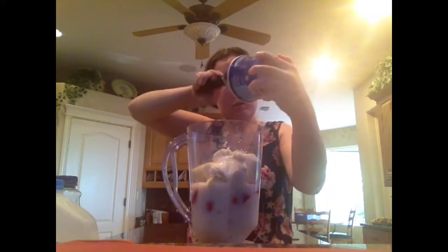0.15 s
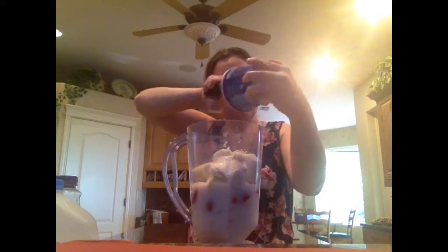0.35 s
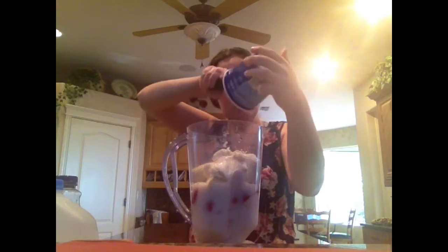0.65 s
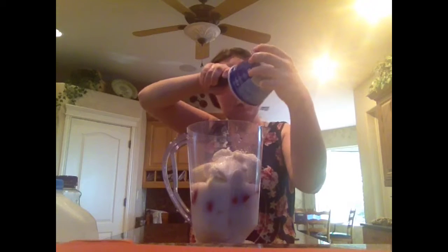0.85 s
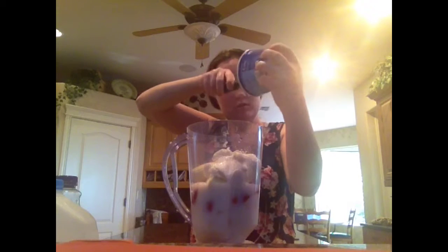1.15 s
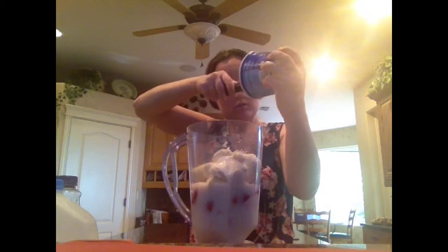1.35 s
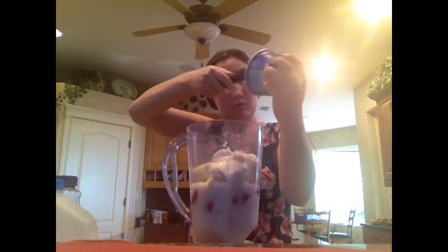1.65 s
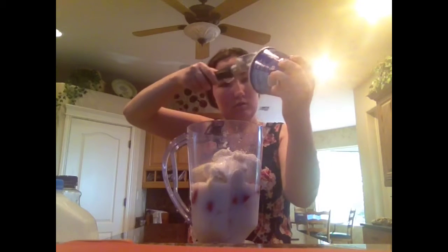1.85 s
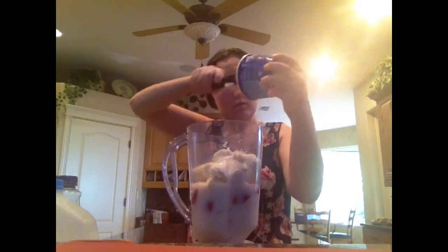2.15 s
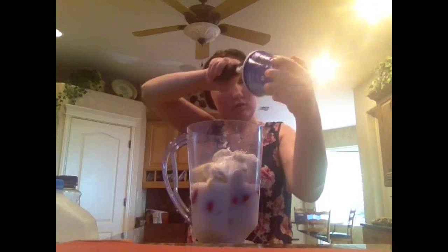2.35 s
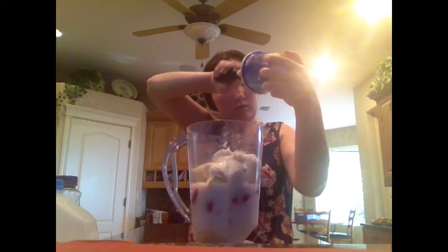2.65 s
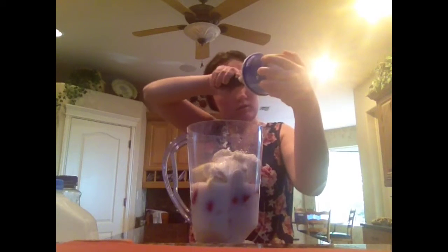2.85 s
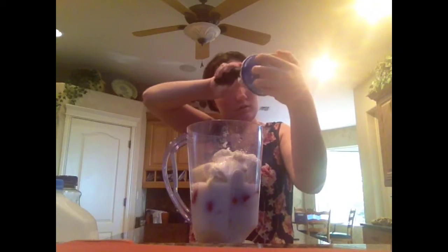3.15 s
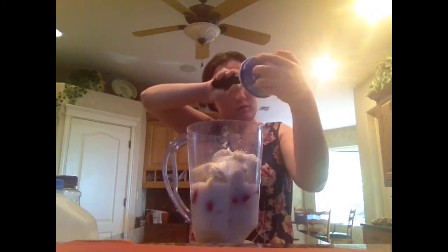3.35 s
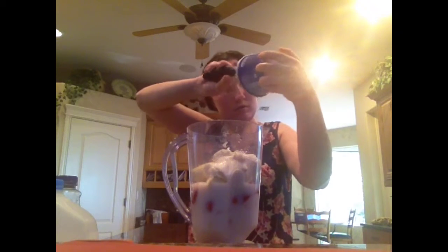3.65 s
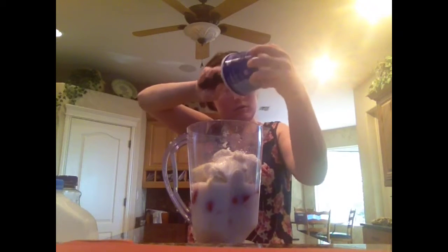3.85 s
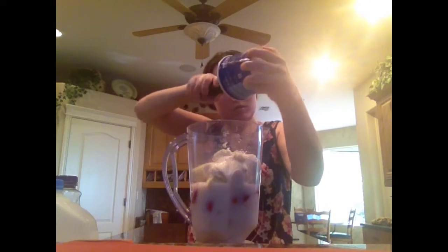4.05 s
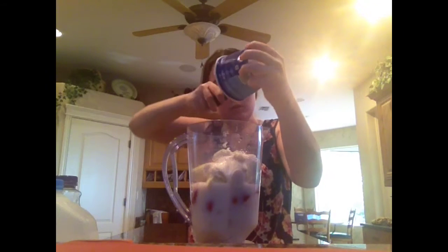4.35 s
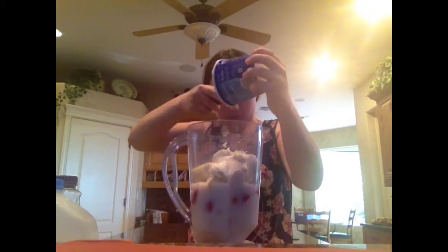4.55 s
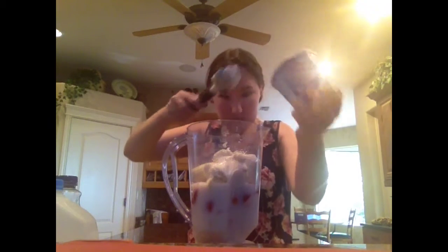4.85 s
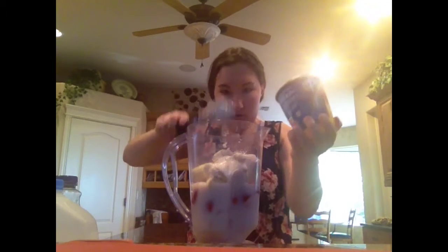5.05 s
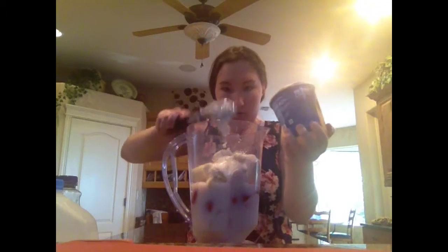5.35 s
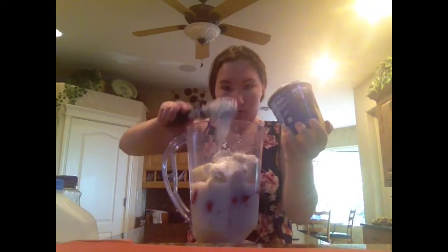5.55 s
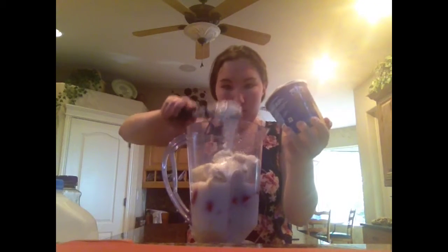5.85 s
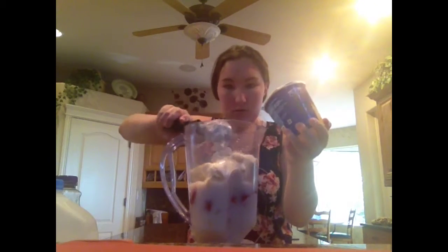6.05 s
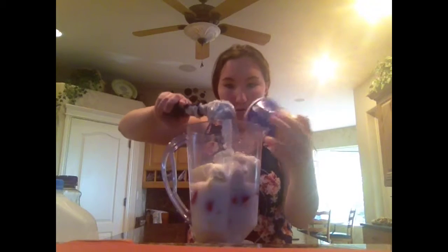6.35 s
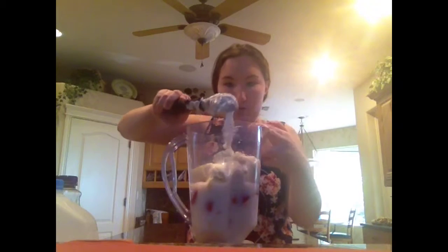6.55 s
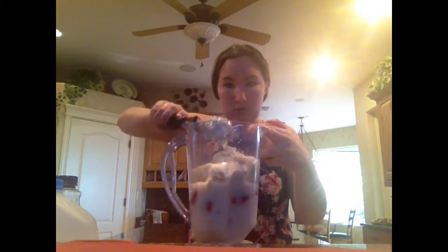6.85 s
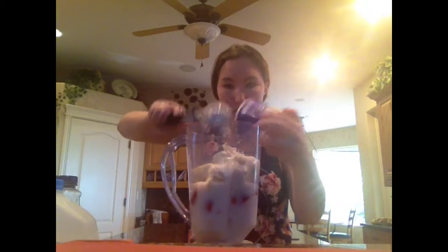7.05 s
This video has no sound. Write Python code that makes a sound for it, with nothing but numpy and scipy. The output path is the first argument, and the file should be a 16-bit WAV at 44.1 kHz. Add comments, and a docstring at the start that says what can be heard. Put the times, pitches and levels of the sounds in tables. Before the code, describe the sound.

A faint, low rush of air fills a live kitchen throughout. At 0.1 s a thin plastic tub wall buckles with a loud dull pop. From 0.25 to 1.7 s a metal spoon scrapes frozen yogurt in swelling strokes, icy hiss over a hollow, squeaky plastic note, with a short gap around 0.7 s and sharp slips near 1.65 s. After a lull, another pop and brief icy crunch come at 2.15 s; softer strokes run from 2.55 to 3.55 s. From 3.7 to 4.7 s the scraping is strongest and fastest, with hard snapping catches and small pops. After a short pause, the loaded spoon knocks a half-full plastic pitcher's rim at 5.1, 5.4, 5.65, 6.0, 6.7 and 7.1 s: damped low thuds with a broad clack and diffuse room tail, light ticks in between. A small microphone leaves little deep bass.

```python
"""Throughout, shaped broadband noise gives the low rush of moving air in a live kitchen.
From the start a metal spoon scrapes frozen yogurt out of a thin plastic tub: breaking ice crystals hiss and
excite the wall's resonances, the wall squeaks as the spoon slips, and decaying modes pop as it buckles.
The loaded spoon then knocks six times on the rim of a half-full plastic pitcher: low modes thud, a noise
burst clacks, and diffuse reflections ring after each knock; lighter touches tick in between."""
import sys
import numpy as np
from scipy import signal
from scipy.fft import rfft, irfft
from scipy.io import wavfile

SR = 44100
rng = np.random.default_rng(int(sys.argv[2]) if len(sys.argv) > 2 else 0)


def store_pcm(level_fs):
    """Save levels as 16-bit WAV."""
    pcm = np.round(np.clip(level_fs, -1, 1) * 32767).astype(np.int16)
    wavfile.write(sys.argv[1], SR, np.atleast_2d(pcm).T)


N = 317079
SHORT = np.arange(SR // 4) / SR   # time axis of one short sound, s


def from_db(db):
    """Logarithmic level: 20 dB is a factor of ten in amplitude."""
    return 10 ** (np.asarray(db) / 20)


def rms_one(x):
    """Normalization: scale to unit rms."""
    return x / np.sqrt(np.mean(x ** 2) + 1e-20)


def at_hz(points, hz):
    """Interpolation on a logarithmic frequency axis."""
    f, value = np.transpose(points)
    return np.interp(np.log(np.maximum(hz, 1)), np.log(f), value)


def add(track, s, sound):
    """Superposition: add a sound to the track at time s."""
    at = round(s * SR)
    track[at:at + len(sound)] += sound[:N - at]


def colour(x, spectrum, tilt=0):
    """Spectral shaping: filter to a spectrum tilted in dB per octave about 2 kHz; rms 1."""
    hz = np.maximum(np.fft.rfftfreq(len(x), 1 / SR), 1)
    gain = from_db(at_hz(spectrum, hz) + tilt * np.log2(hz / 2000))
    return rms_one(irfft(rfft(x) * gain, len(x)))


def drift(per_s):
    """Random modulation: chance values, per_s a second, joined by straight lines; rms 1."""
    place = np.arange(N) / SR * per_s
    return rms_one(np.interp(place, np.arange(N), rng.standard_normal(N)))


def resonance(x, hz, width_hz):
    """Two-pole resonance: bandwidth sets the pole radius; the centre may move in short blocks."""
    radius = np.exp(-np.pi * width_hz / SR)
    angle = 2 * np.pi * np.broadcast_to(hz, x.shape) / SR
    out, state, size = np.zeros(len(x)), np.zeros(2), 512
    for i in range(0, len(x), size):
        poles = [1, -2 * radius * np.cos(angle[i]), radius * radius]
        out[i:i + size], state = signal.lfilter([1, 0, -1], poles, x[i:i + size], zi=state)
    return out


def struck(modes, pitch, spread_db):
    """Modal superposition: exponentially decaying sines, alternate in sign, with random level spread."""
    hz, db, t60 = np.transpose(modes)[:, :, None]
    gain = from_db(db + spread_db * rng.standard_normal(db.shape) - 60 * SHORT / t60)
    signs = (-1) ** np.arange(len(modes))
    return signs @ (gain * np.sin(2 * np.pi * hz * pitch * SHORT))


def burst(spectrum, tilt, rise_s, t60):
    """Modal overlap: noise stands for many crowded modes that swell and die together."""
    swell = 1 - np.exp(-(SHORT / rise_s) ** 2)
    noise = colour(rng.standard_normal(len(SHORT)), spectrum, tilt)
    return noise * swell * from_db(-60 * SHORT / t60)


def spurt(sound, db, length):
    """Energy scaling: a short sound gets the energy of level db held for length seconds."""
    return from_db(db) * sound * np.sqrt(length * SR / np.sum(sound ** 2))


# spectrum of the moving air: (f/Hz, relative level per Hz/dB)
AIR_SPECTRUM = [(30, -2), (75, -27), (120, -10.5), (190, 0.5), (280, -9), (480, -4.5), (750, -16.5),
                (1100, -19.5), (2000, -22), (4000, -29.5), (7500, -35), (10500, -43.5), (14000, -38.5),
                (15500, -39)]


def air(level_db=-56.5, waver_db=0.96):
    """Broadband noise: the low rush is shaped noise whose level wavers slightly."""
    level = from_db(level_db + waver_db * drift(8))
    return level * colour(rng.standard_normal(N), AIR_SPECTRUM)


# decay of the kitchen's reverberation: (f/Hz, t60/s)
ROOM_DECAY = [(120, .5), (400, 0.6157), (2000, 0.7261), (5000, 0.63), (9000, 0.44), (15000, 0.15)]


def reverberation(spectrum, tilt=0, build_s=0.0073):
    """Diffuse field: one second of dense reflections, builds quickly, decays by band; energy 1."""
    t, hz = np.arange(SR) / SR, np.fft.rfftfreq(SR, 1 / SR)
    noise = rfft(colour(rng.standard_normal(SR), spectrum, tilt))
    centres, tail = [f for f, t60 in ROOM_DECAY], 0
    # overlapping bands, each with its own decay
    for share, (f, t60) in zip(np.eye(len(centres)), ROOM_DECAY):
        band = irfft(noise * at_hz(list(zip(centres, share)), hz), SR)
        tail = tail + band * from_db(-60 * t / t60)
    tail = tail * (1 - np.exp(-(t / build_s) ** 2))
    return tail / np.sqrt(np.sum(tail ** 2))


# spectrum of the kitchen's reflections: (f/Hz, relative level per Hz/dB)
ROOM_SPECTRUM = [(100, 1.5), (250, 0.5), (500, -2.5), (1000, 2.5), (2200, -1), (6000, 0), (14000, 3)]


def kitchen(x, wet_db):
    """Convolution: the direct sound plus its diffuse reflections."""
    return x + from_db(wet_db) * signal.fftconvolve(x, reverberation(ROOM_SPECTRUM))[:N]


# buckling of the tub wall: (t/s, level/dB)
WALL_POPS = [(0.1041, -24), (2.1747, -29), (3.711, -42.5), (4.3372, -40.5)]
# modes of the buckling wall: (f/Hz, relative level/dB, t60/s)
WALL_MODES = [(242, 2, 0.036), (335, 0.5, 0.026), (464, -9.5, 0.03), (774, 0.5, 0.031),
              (2230, -13.5, 0.012), (3380, -42, 0.0014)]
# click of the wall, also the tick of a light touch on the rim: (f/Hz, relative level per Hz/dB)
TICK_SPECTRUM = [(100, -42), (1000, 0.5), (2000, 10), (3200, 6), (5000, 0.5), (9000, -21), (15000, -34)]


def pops(snap_db=-18):
    """Snap-through buckling: the thin wall clicks and its modes give a dull, quickly damped note."""
    out = np.zeros(N)
    for s, db in WALL_POPS:
        snap = from_db(snap_db) * burst(TICK_SPECTRUM, 0, rise_s=0.000037, t60=0.038)
        add(out, s, from_db(db) * (struck(WALL_MODES, 1, spread_db=0.0) + snap))
    return out


def crystals(per_s, spread_db):
    """Random impulse process: ice crystals break under the edge, most small, a few large."""
    sizes = from_db(spread_db * np.minimum(rng.exponential(1, N), 5)) * rng.choice([-1, 1], N)
    return rms_one(sizes * (rng.random(N) < per_s / SR))


def tub_wall(x, hz=745, width_hz=250, wander=0.034):
    """Cascaded resonance: the tub's hollow note, steep on both sides, shifts as the spoon presses elsewhere."""
    centre = hz * (1 + wander * drift(13)[:len(x)])
    return rms_one(resonance(resonance(x, centre, width_hz), centre, width_hz))


# spectrum of the scraping hiss: (f/Hz, relative level per Hz/dB)
HISS_SPECTRUM = [(400, -27), (1100, -6), (1600, -22), (2600, 2), (3500, 2), (4900, -1.5), (6000, -3),
                 (7000, -3.5), (8500, -8.5), (10500, -19.5), (15000, -35)]


def crunch(grains, patchy_db=1.9, patches_per_s=80, count=12):
    """Independent band modulation: as the contact shifts, each treble band flares and fades by itself."""
    edges, out = np.geomspace(1400, 15000, count + 1), 0
    for low, high in zip(edges, edges[1:]):
        band_pass = signal.butter(2, [low, high], "band", fs=SR, output="sos")
        band = signal.sosfilt(band_pass, grains)
        out = out + band * from_db(patchy_db * drift(patches_per_s))
    return colour(out, HISS_SPECTRUM)


# spoon strokes: (start t/s, end t/s, force level/dB, ring at mid-stroke f/Hz, hiss peak f/Hz);
# both frequencies are those before the wall flexes
SPOON_STROKES = [(0.25, 0.381, -5.5, 1860, 5000), (0.384, 0.521, 0, 1870, 6940),
                 (0.5, 0.675, -14.5, 2040, 4640), (0.84, 1.19, -2, 2000, 6630),
                 (1.183, 1.435, 0, 2120, 4560), (1.405, 1.727, -9, 2080, 3300),
                 (2.558, 2.672, -15, 1950, 5500), (2.635, 2.792, 0, 1980, 2870),
                 (2.796, 2.912, -8.5, 1970, 3340), (2.949, 3.13, -13, 2070, 4470),
                 (3.073, 3.312, -3.5, 2000, 4450), (3.298, 3.54, -3, 1900, 3720),
                 (3.797, 3.881, 7.5, 1880, 8100), (3.88, 4.012, 2, 1910, 4870),
                 (4.005, 4.112, 8, 1950, 4900), (4.113, 4.296, 3, 2040, 6630),
                 (4.346, 4.514, 4, 1980, 6800), (4.5, 4.719, -5, 1950, 6800)]
# force drives all three voices: level at 0 dB of force, and dB gained per dB of force
RING_DB = -53   # gains 1 dB per dB
WALL_DB, WALL_FOLLOWS = -56, 0.68
HISS_DB, HISS_FOLLOWS = -54, 0.76
RING_RISE_HZ_PER_S = 320   # the note climbs as the spoon travels along the wall


def scraping(judder_db=0.4, judder_per_s=130, wander=0.024, squeak_db=-7.5, roundness=0.94):
    """Excitation and resonance: in each swelling stroke, crushed crystals hiss and drive the tub."""
    out = np.zeros(N)
    grains = crystals(per_s=6000, spread_db=1.5) * from_db(judder_db * drift(judder_per_s))
    rasp, wall = crunch(grains), tub_wall(grains)
    flex = 1 + wander * drift(25)   # the notes shift as the wall bends
    for start, end, force_db, ring_hz, hiss_hz in SPOON_STROKES:
        on = slice(round(start * SR), round(end * SR))
        from_middle_s = np.arange(on.start, on.stop) / SR - (start + end) / 2
        hz = (ring_hz + RING_RISE_HZ_PER_S * from_middle_s) * flex[on]
        ring = rms_one(resonance(resonance(grains[on], hz, width_hz=170), hz, width_hz=2000))
        squeak = rms_one(resonance(grains[on], hiss_hz * flex[on], width_hz=280))
        hiss = rms_one(rasp[on] + from_db(squeak_db) * squeak)
        voices = (from_db(RING_DB + force_db) * ring
                  + from_db(WALL_DB + WALL_FOLLOWS * force_db) * wall[on]
                  + from_db(HISS_DB + HISS_FOLLOWS * force_db) * hiss)
        pressure = np.sin(np.pi * (np.arange(len(ring)) + .5) / len(ring)) ** roundness
        add(out, start, pressure * voices)
    return out


# spectrum of crushed ice: (f/Hz, relative level per Hz/dB)
GRIT_SPECTRUM = [(100, -24), (1200, -5.5), (2000, 5.5), (2800, -1.5), (5000, -4), (7200, -3.5),
                 (10000, -14.5), (15000, -33)]


def grit(db, length, envelope):
    """Enveloped noise: a short spurt of crushed ice."""
    return spurt(colour(rng.standard_normal(len(SHORT)), GRIT_SPECTRUM) * envelope, db, length)


def faint_slips(per_s=7.6, top_db=-55.5, range_db=2, length_s=.0015):
    """Random renewal process: tiny catches from first stroke to last; rows (t/s, level/dB, decay/s)."""
    first, last = SPOON_STROKES[0][0], SPOON_STROKES[-1][1]
    gaps, weakness = rng.random((80, 2)).T
    times = first + np.cumsum(.5 + gaps) / per_s
    levels = top_db - range_db * weakness
    return [(s, db, length_s) for s, db in zip(times, levels) if s < last]


# the spoon catches hard and slips: (t/s, wall level/dB, decay time constant/s)
HARD_SLIPS = [(1.641, -43, 0.019), (1.678, -37.5, 0.0065), (1.701, -41, 0.0041), (2.319, -50, .002),
              (2.491, -50, 0.0044), (2.637, -45, .0038), (2.666, -41, 0.0022), (2.766, -44, 0.0049),
              (3.008, -52.5, 0.0021), (3.09, -47.5, 0.0018), (3.708, -38, 0.0032), (3.737, -44, 0.0042),
              (3.822, -32.5, 0.0031), (3.853, -43.5, 0.0057), (4.066, -37, 0.0074), (4.337, -36, 0.0028),
              (4.474, -43.5, 0.0039)]
ORDINARY_SLIP_S = 0.0047
SLIP_GRIT_DB = -10   # grit against the wall, for an ordinary slip
SLOW_SLIP_DULLS_DB = 5   # grit lost per doubling of the length


def slips(wall_ring_s=0.00061):
    """Stick-slip: each release spurts grit, more of it when quick, and the wall answers."""
    out = np.zeros(N)
    for s, db, length in HARD_SLIPS + faint_slips():
        dying = np.exp(-SHORT / length)
        wall = tub_wall(rng.standard_normal(len(SHORT)) * dying)
        add(out, s, spurt(wall, db, length + wall_ring_s))   # the wall rings a little longer
        grit_db = db + SLIP_GRIT_DB - SLOW_SLIP_DULLS_DB * np.log2(length / ORDINARY_SLIP_S)
        add(out, s, grit(grit_db, length, dying))
    return out


# the edge digs into fresh ice: (t/s, level/dB)
ICE_DIGS = [(2.149, -52), (3.8, -47)]


def digs(length_s=.027):
    """Steady fracture: cutting into ice makes an even run of grit that stops when the edge is through."""
    out = np.zeros(N)
    for s, db in ICE_DIGS:
        add(out, s, grit(db, length_s, envelope=SHORT < length_s))
    return out


# modes of pitcher and counter, before each knock's pitch ratio: (f/Hz, relative level/dB, t60/s)
PITCHER_MODES = [(118.5, -11, 0.11), (140, -11.5, 0.092), (255, -7.5, 0.092), (319, -3.5, 0.085),
                 (425.7, 3, 0.07), (545.6, -4, 0.066), (701, -4, 0.053), (863, -12, 0.027),
                 (1283, -23.5, 0.049), (1506, -18, 0.13), (1790, -29, 0.1), (2159, -12.5, 0.051)]


def rim_modes(main_db):
    """Modal participation: where the spoon lands raises or lowers the strongest mode."""
    main = max(PITCHER_MODES, key=lambda mode: mode[1])
    return [(hz, db + main_db * (hz == main[0]), t60) for hz, db, t60 in PITCHER_MODES]


# knocks on the rim: (t/s, relative clack level/dB, relative thud level/dB, pitch ratio,
# brightness/dB per octave, main note's relative level/dB, set by the spot struck)
RIM_KNOCKS = [(5.0737, -21.5, -16.5, 0.99, 0, -0.5), (5.3852, -21, -16, 1.02, 0.3, -3),
              (5.6543, -18, -13.5, 0.96, -0.5, -1), (5.9750, -18, -14.5, 1.023, -2, 0),
              (6.6734, -17.5, -15, 1.04, -2.5, -7), (7.0797, -20.5, -17.5, 0.93, -0.56, -11)]
# light touches on the rim: (t/s, relative level/dB, brightness/dB per octave)
RIM_TOUCHES = [(5.461, -34, -9), (5.7507, -33.5, -3.5), (6.098, -29.5, -4.5), (6.502, -46, -7.5),
               (7.013, -41, 7), (7.024, -49, 5), (7.177, -40, -4)]
# crowded upper modes of the pitcher wall: (f/Hz, relative level per Hz/dB)
CLACK_SPECTRUM = [(80, -16), (400, 4.5), (1050, -5.5), (1600, -0.5), (2300, -1.5), (2800, -6), (4500, -8),
                  (6200, -12), (8300, -16), (10500, -25), (15000, -31)]
# a knock as the room returns it: (f/Hz, relative level per Hz/dB)
WASH_SPECTRUM = [(90, -20), (200, -3.5), (430, 7.5), (700, 1), (1000, -0.5), (1500, 1), (2200, -1.5),
                 (3000, -6), (6000, -12.5), (8500, -14), (11000, -20.5), (15000, -14)]


def pitcher(clack_db=3.5, wash_db=-4.5, bend_s=0.0012):
    """Impact excitation: the spoon bends the rim, low modes thud and the wall clacks; light touches tick."""
    body, wall = np.zeros(N), np.zeros(N)
    for s, wall_db, thud_db, pitch, tilt, main_db in RIM_KNOCKS:
        bending = 1 - np.exp(-SHORT / bend_s)
        thud = struck(rim_modes(main_db), pitch, spread_db=0.5) * bending
        add(body, s, from_db(thud_db) * thud)
        clack = from_db(wall_db + clack_db) * burst(CLACK_SPECTRUM, tilt, rise_s=0.0026, t60=0.058)
        add(wall, s, clack)
        # the wall radiates differently in every direction, so the room returns an even wash
        clack_size = np.sqrt(np.sum(clack ** 2))
        add(wall, s, from_db(wash_db) * clack_size * reverberation(WASH_SPECTRUM, tilt))
    for s, db, tilt in RIM_TOUCHES:
        add(body, s, from_db(db + clack_db) * burst(TICK_SPECTRUM, tilt, rise_s=0.0003, t60=0.019))
    return wall + kitchen(body, wet_db=-10.5)


def scene():
    """Linear superposition: air, tub and pitcher sound in the same kitchen."""
    buckling = kitchen(pops(), wet_db=-12.5)
    spooning = kitchen(scraping() + digs() + slips(), wet_db=-10.0)
    return (air() + buckling + spooning + pitcher())[None]


def record(dry, low_cut_hz=85, top_cut_hz=15600):
    """Band limiting: a small microphone loses the deep bass; the top is cut."""
    high_pass = signal.butter(3, low_cut_hz, "high", fs=SR, output="sos")
    low_pass = signal.ellip(10, .1, 80, top_cut_hz, fs=SR, output="sos")
    return signal.sosfilt(low_pass, signal.sosfilt(high_pass, dry))


dry = scene()
out = record(dry)
store_pcm(out)
```